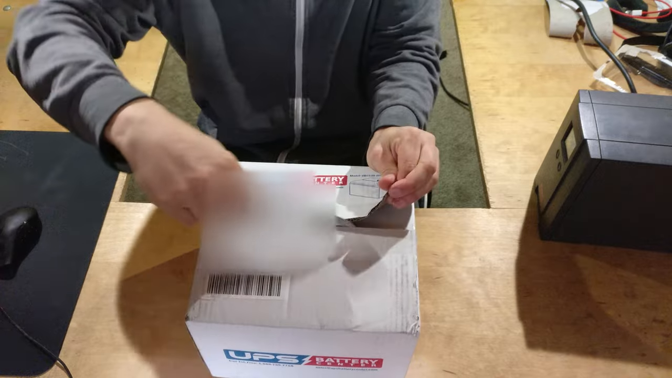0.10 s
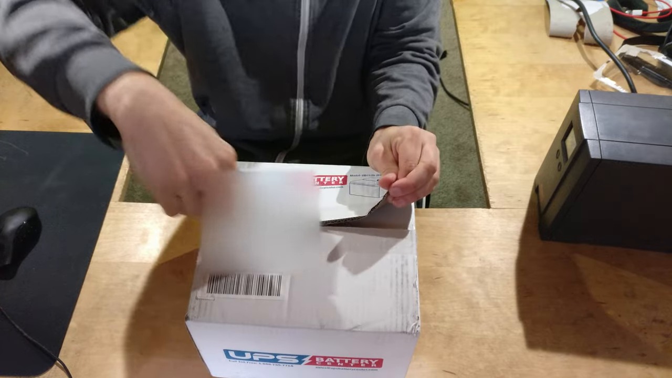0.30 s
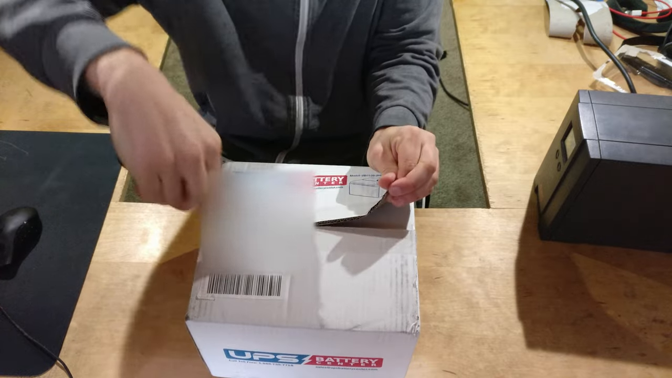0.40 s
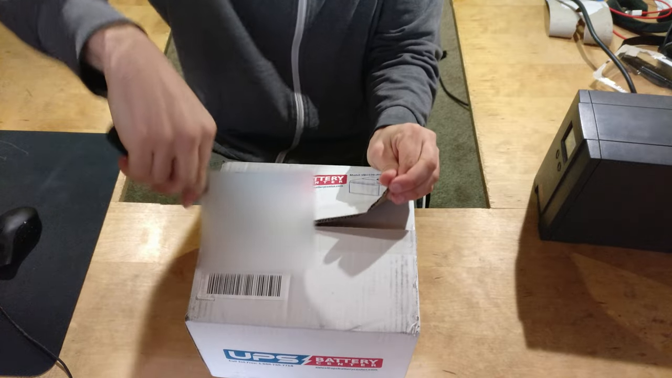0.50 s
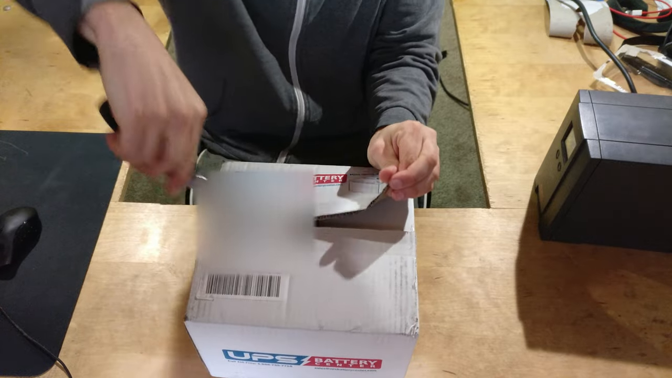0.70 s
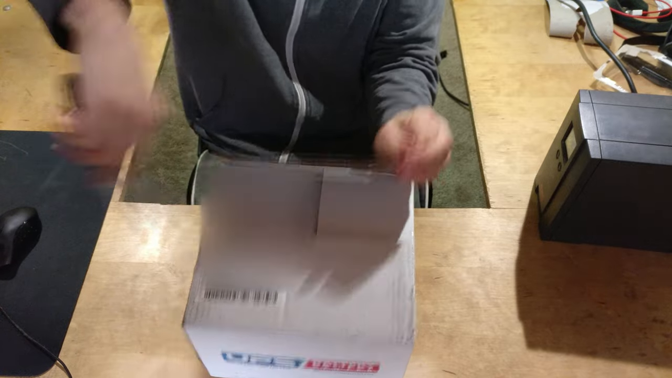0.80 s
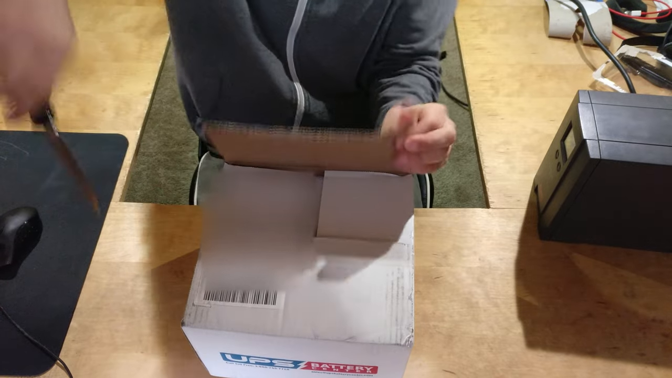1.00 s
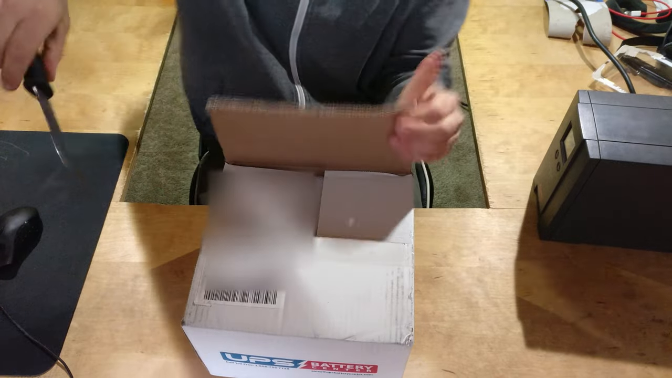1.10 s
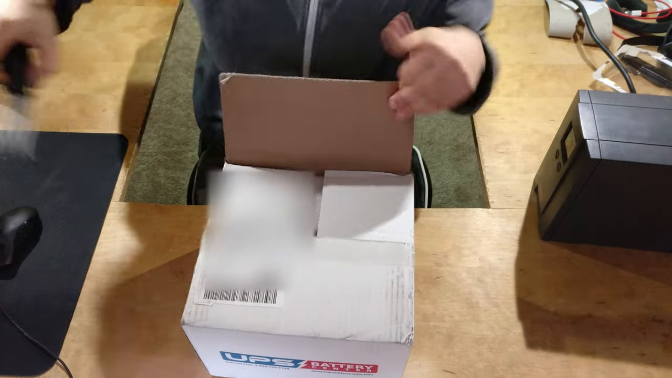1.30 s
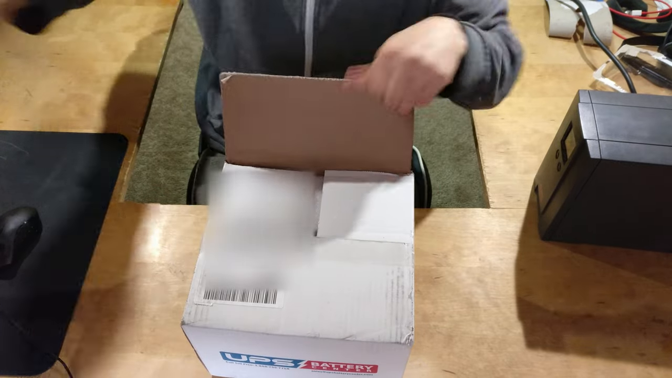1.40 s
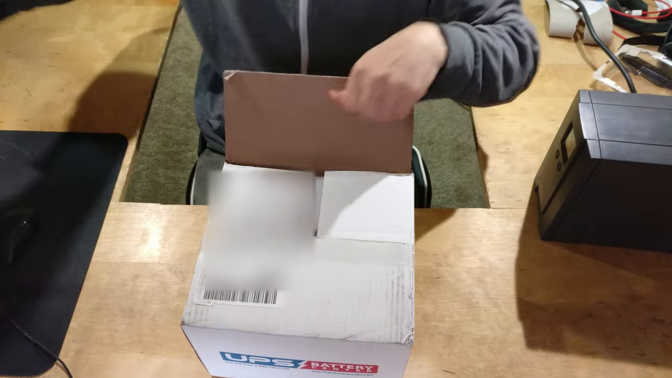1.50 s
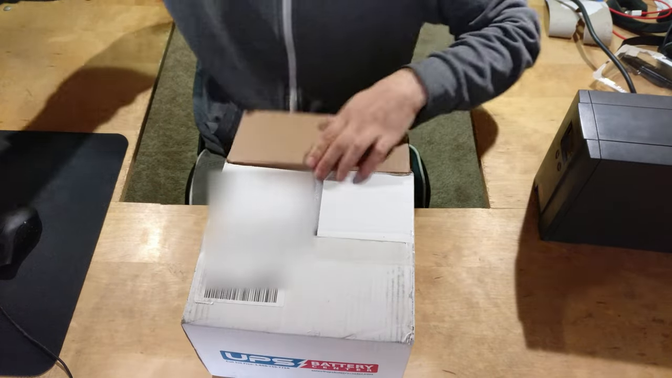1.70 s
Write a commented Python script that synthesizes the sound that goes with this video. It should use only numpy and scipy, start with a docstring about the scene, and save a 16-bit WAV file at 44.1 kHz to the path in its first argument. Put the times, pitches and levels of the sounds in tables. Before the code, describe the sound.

Cardboard box being torn open: hollow thumps, tape snapping loose, then soft brushing of flaps

```python
"""Hands work a cardboard box on a desk below a stereo microphone in a small quiet room, for 1.8 seconds.
After a faint knock, hard knocks ring the hollow box near 0.2 s while tape and flaps scrape in short pulls.
Tape snaps free, hardest near 0.8 s, and shaking swells just after; from 1.16 s hands softly brush the flaps.
A few last knocks and scrapes follow 1.5 s. Decaying modes make the box, random clicks the tape and board,
and noise the snaps; a faint noise hiss lies under all, and the right port hears more of the top treble."""
import sys
import numpy as np
from scipy import signal
from scipy.fft import rfft, irfft, next_fast_len
from scipy.io import wavfile
from scipy.ndimage import uniform_filter1d

SR = 44100
rng = np.random.default_rng(int(sys.argv[2]) if len(sys.argv) > 2 else 0)


def level_to_linear(level):
    """Convert decibel levels to linear amplitude factors, elementwise."""
    exponent = np.asarray(level, float) / 20
    return 10 ** exponent


def wav_out(sig):
    """Save sig, one row per channel (or a flat mono array), as 16-bit PCM at SR to the path in sys.argv[1]."""
    wavfile.write(sys.argv[1], SR, np.round(np.clip(np.atleast_2d(sig).T, -1, 1) * 32767).astype(np.int16))


N = 79380  # length in samples
BRUSH_FROM_S = 1.16  # from here hands brush the flaps
SLIPS_PER_S, SLIP_SCATTER_DB = 3000, 2  # board slips, heard directly and through the box


# How the flap's changing tension shifts the pitch of the panels.
# Each row: time in seconds, pitch ratio of the panel modes.
FLAP_TENSION = [(.79, 1.05), (0.863, 1.02), (0.886, 1.1), (.93, 1.1)]
PANEL_FROM_HZ = 400  # modes above this belong to the panels


def ring(force, hz, t60_s):
    """One mode: pushed by a force, it swings at its pitch and dies away; panel modes follow the tension."""
    ratio = np.ones(N)
    if hz > PANEL_FROM_HZ:
        ratio = np.interp(np.arange(N) / SR, *np.array(FLAP_TENSION).T)
    turn = np.exp(2j * np.pi * np.cumsum(hz * ratio) / SR)
    decay = np.exp(-np.log(1000) / (t60_s * SR))
    # Take out the rotation, let the force decay, then put the rotation back.
    swing = signal.lfilter([1], [1, -decay], force / turn)
    return (turn * swing).imag


def closeness(hz, spot_hz, octaves):
    """A struck or rubbed spot drives the modes near its favoured pitch most."""
    return np.exp(-.5 * (np.log2(hz / spot_hz) / octaves) ** 2)


# The ways the hollow box vibrates.
# Each row: pitch in Hz, gain in dB, time to fade by 60 dB in seconds.
BOX_MODES = [(50.5, 10, .2), (80.4, -7, .15), (108.35, -1, 0.15), (186, -6, 0.14), (230, 1.5, 0.053),
             (308, -8, 0.065), (435, -14, .08), (572, -12.5, .1), (626, 0, .07), (823, -14.5, .06),
             (1073, -12.5, 0.061), (1510, -18, .045), (1850, -8, 0.055), (2680, -12, .035)]
# Knocks on the box.
# Each row: start in seconds, push strength in dB, pitch in Hz that the spot favours, breadth in octaves.
KNOCKS = [(0.054, -48.5, 181, 0.95), (0.2124, -14, 227, 0.9), (0.257, -20.5, 300, 0.97),
          (.258, -38, 2070, .5), (0.271, -6.5, 138.8, 0.38), (.465, -24, 300, 0.76),
          (.4925, -15.5, 217, 0.67), (0.521, -14, 284, 0.29), (.547, -19.5, 250, 0.95),
          (.591, -10.5, 1520, 0.073), (.602, -20.5, 168, 0.82), (.794, -18, 337, 1.5),
          (.815, -14, 300, 0.42), (.865, -13, 395, 3.5), (0.869, -14, 1410, 0.95), (0.884, -13, 54.8, 1.3),
          (1.099, -38.5, 101, 2), (1.18, -51, 90, .5), (1.27, -49, 89, .4), (1.535, -23, 100, 0.53),
          (1.563, -12.5, 335, 0.2), (1.595, -35.5, 74, 3.2), (1.737, -27, 113, 0.87),
          (1.748, -28.5, 144, 1.22)]
# The box shaking under the hands.
# Each row: time in seconds, level of the ringing in dB.
SHAKE_LEVEL = [(0.2, -76.5), (0.292, -41), (0.345, -38.5), (0.41, -33), (0.487, -20), (0.632, -26.5),
               (0.666, -31), (0.792, -30), (0.916, -12.5), (1.004, -36.5), (1.042, -50.5), (1.434, -82.5),
               (1.554, -48), (1.692, -67), (1.746, -35), (1.8, -37.5)]
SHAKE_HZ, SHAKE_OCTAVES = 108, .5
JOLTS_PER_S, JOLT_SCATTER_DB = 330, -1
RASP_INTO_BOX_DB, RASP_SPOT_HZ, RASP_OCTAVES = -27.5, 300, 1.2
PUSH_CYCLES = 0.35  # contact time, in cycles of the mode or favoured pitch, whichever is higher


def box():
    """Knocks, jolts and slipping board push the modes of the hollow box, which ring and add up."""
    jolts = clicks(JOLTS_PER_S, JOLT_SCATTER_DB)
    rung_jolts = 0
    for hz, gain_db, t60_s in BOX_MODES:
        share = closeness(hz, SHAKE_HZ, SHAKE_OCTAVES)
        rung_jolts = rung_jolts + level_to_linear(gain_db) * share * ring(jolts, hz, t60_s)
    shake_db = np.interp(np.arange(N) / SR, *np.array(SHAKE_LEVEL).T, left=-90)
    shake = jolts * level_to_linear(shake_db) / np.std(rung_jolts)
    slips = unit(clicks(SLIPS_PER_S, SLIP_SCATTER_DB)) * pull_gain(True) * level_to_linear(RASP_INTO_BOX_DB)

    out = 0
    for hz, gain_db, t60_s in BOX_MODES:
        force = shake * closeness(hz, SHAKE_HZ, SHAKE_OCTAVES)
        force = force + slips * closeness(hz, RASP_SPOT_HZ, RASP_OCTAVES)
        for start_s, strength_db, spot_hz, octaves in KNOCKS:
            push = np.hanning(int(PUSH_CYCLES * SR / max(hz, spot_hz)) + 3)
            push = push / push.sum() * level_to_linear(strength_db) * closeness(hz, spot_hz, octaves)
            first = int(start_s * SR)
            force[first:first + len(push)] -= push
        out = out + level_to_linear(gain_db) * ring(force, hz, t60_s)
    return out


# Tape fibres snapping.
# Each row: start in seconds, level in dB at the start of the burst.
SNAPS = [(0.261, -49), (0.3946, -48), (0.464, -39.5), (0.5204, -40), (0.5493, -23.5), (0.6572, -45.5),
         (0.7719, -30), (0.7929, -17), (0.8662, -14.5), (1.0962, -48.5), (1.5636, -37.5), (1.731, -49.5)]
# Tone of the crackle and snaps.
# Each row: frequency in Hz, relative level in dB.
CRACKLE_TONE = [(880, -37), (1500, -3), (1890, -8), (2760, -7), (5190, -11.5), (8560, -15.5),
                (14700, -19.5), (16400, -35)]
# How much brighter a brush is than the tape.
# Each row: frequency in Hz, lift in dB.
BRUSH_LIFT = [(6000, 0), (13000, 4.5)]
CRACKLES_PER_S, CRACKLE_SCATTER_DB = 9000, 1.5
CRACKLE_SPREAD = 1  # share of the power heard by one port only
SNAP_MS = 2  # time for a snap to fade to about a third


def tape():
    """Dense clicks crackle along with each pull, and short noise bursts sound where fibres snap."""
    t = np.arange(N) / SR
    bursts = 0
    for start_s, level_db in SNAPS:
        fade = np.exp(-np.maximum(t - start_s, 0) * 1000 / SNAP_MS)
        bursts = bursts + level_to_linear(level_db) * (t >= start_s) * fade
    crackle = spread(lambda: clicks(CRACKLES_PER_S, CRACKLE_SCATTER_DB), CRACKLE_SPREAD)
    crackle = unit(colour(crackle, CRACKLE_TONE))
    crackle = np.where(t < BRUSH_FROM_S, crackle, colour(crackle, BRUSH_LIFT))
    snap = spread(lambda: rng.standard_normal(N), CRACKLE_SPREAD)
    snap = unit(colour(snap, CRACKLE_TONE))
    return pull_gain(False) * patchy() * crackle + bursts * snap


# Tone of the rasping board.
# Each row: frequency in Hz, relative level in dB.
RASP_TONE = [(170, -30.5), (300, -7), (579, 1), (866, -9), (1040, -10.5), (1110, -14), (1890, -11.5),
             (2600, -18), (3380, -69)]
RASP_SPREAD = 0.16  # share of the power heard by one port only


def rasp():
    """Corrugated board slips and creases: random clicks that follow each pull."""
    slips = spread(lambda: clicks(SLIPS_PER_S, SLIP_SCATTER_DB), RASP_SPREAD)
    return unit(colour(slips, RASP_TONE)) * pull_gain(True) * patchy()


# Pulls, scrapes and brushes of the hands.
# Each row: start in seconds, end in seconds, crackle in dB at the start, crackle in dB at the end,
# rasp in dB above the crackle.
PULLS = [(0.208, 0.221, -53, -63.5, 11), (0.254, 0.312, -51.5, -79, 12), (0.318, 0.408, -74.5, -62, 3.5),
         (0.382, 0.501, -63, -51.5, 7.5), (0.515, 0.612, -44, -38, 1.5), (0.615, 0.66, -87, -81, 13),
         (0.651, 0.698, -52, -47.5, 4), (0.743, 0.783, -55.5, -64, -2), (0.771, 0.787, -36, -46.5, 4.5),
         (0.793, 0.87, -35.5, -33.5, 2.5), (0.863, 0.945, -25.5, -52, 8), (0.974, 1.034, -60.5, -71, 5.5),
         (1.065, 1.096, -69.5, -67, -3), (1.099, 1.123, -53.5, -66.5, 5.5), (1.212, 1.259, -77.5, -72, -11),
         (1.267, 1.363, -82, -67.5, -4), (1.362, 1.511, -78, -72, 3), (1.521, 1.553, -66, -57, 6),
         (1.56, 1.6, -52.5, -65.5, 11), (1.593, 1.64, -54.5, -40.5, -6), (1.652, 1.749, -57, -61, -3.5),
         (1.726, 1.781, -52, -62.5, 0.5)]
PULL_ATTACK_MS, PULL_RELEASE_MS = 3.2, 7.2


def pull_gain(with_rasp):
    """Gain over time: each pull starts sharply, slides in level and lets go."""
    t = np.arange(N) / SR
    out = 0
    for start_s, end_s, start_db, end_db, rasp_db in PULLS:
        rise = np.clip((t - start_s) * 1000 / PULL_ATTACK_MS, 0, 1)
        fall = np.exp(-np.maximum(t - end_s, 0) * 1000 / PULL_RELEASE_MS)
        level_db = np.interp(t, [start_s, end_s], [start_db, end_db]) + with_rasp * rasp_db
        out = out + rise * fall * level_to_linear(level_db)
    return out


PATCHES_PER_S = 200
PATCHY_DB, BRUSH_PATCHY_DB = 3.9, 1.8  # scatter of the gain before it is smoothed


def patchy():
    """Glue lets go unevenly: the gain wavers quickly at random, more gently for brushing hands."""
    patch = int(SR / PATCHES_PER_S)
    depth_db = np.where(np.arange(N) / SR < BRUSH_FROM_S, PATCHY_DB, BRUSH_PATCHY_DB)
    steps = np.repeat(rng.standard_normal(N // patch + 1), patch)
    return level_to_linear(depth_db * uniform_filter1d(steps, patch)[:N])


ROOM_T60_S, ROOM_LOW_DB, ROOM_HIGH_DB = 0.12, -14.5, -4.5
ROOM_SPLIT_HZ = 650  # middle of the slope from low to high level


def room(x):
    """Desk and walls scatter the sound, differently to each port and more so in the treble."""
    t = np.arange(SR // 2) / SR
    fade = np.exp(-np.log(1000) * t / ROOM_T60_S)
    tail = rng.standard_normal((2, len(t))) * fade * (t > .001)
    tail /= np.sqrt(np.sum(tail ** 2, axis=1, keepdims=True))
    wet = signal.fftconvolve(tail, x, axes=1)[:, :N]
    return colour(wet, [(ROOM_SPLIT_HZ / 2, ROOM_LOW_DB), (ROOM_SPLIT_HZ * 2, ROOM_HIGH_DB)])


# Tone of the hiss.
# Each row: frequency in Hz, relative level in dB.
HISS_TONE = [(25, -7), (114, 0.5), (272, -11), (367, -29), (667, -21), (1150, -25), (2260, -29),
             (4710, -32), (14700, -36), (16400, -31.5)]
HISS_DB = -70  # average (rms) level as it reaches the ports


def hiss():
    """Room tone and microphone hiss: steady noise whose bass is mostly shared by both ports."""
    mid, side = rng.standard_normal((2, N))
    side = colour(side, [(150, -10.0), (1500, -2)])
    both = np.array([mid + side, mid - side])
    return level_to_linear(HISS_DB) * unit(colour(both, HISS_TONE))


def clicks(rate, scatter_db):
    """Single-sample clicks at random times, with random sign and strength."""
    hit, size, sign = rng.random(N), rng.exponential(size=N), rng.choice([-1, 1], N)
    return (hit < rate / SR) * sign * level_to_linear(scatter_db * size)


def spread(make, share):
    """A wide source: part reaches both ports alike, part only one."""
    share = np.clip(share, 0, 1)
    common = np.sqrt(1 - share) * make()
    return common + np.sqrt(share) * np.array([make(), make()])


def colour(x, points, share=1):
    """Filter by (Hz, dB) points joined on a log frequency axis; share scales the dB."""
    size = next_fast_len(2 * N)
    hz = np.arange(size // 2 + 1) * SR / size + 1  # 1 Hz up, so the log exists
    point_hz, point_db = np.array(points, float).T
    gain_db = share * np.interp(np.log(hz), np.log(point_hz), point_db)
    return irfft(rfft(x, size) * level_to_linear(gain_db), size)[..., :N]


def unit(x):
    """Scale to an average (rms) level of 1."""
    return x / np.sqrt(np.mean(x ** 2))


BASS_CUT_HZ = 112.3  # a small box radiates little deep bass


def scene():
    """All handling sounds, direct and through the room, with their bass thinned, over the hiss."""
    direct = tape() + rasp() + box()
    handling = direct + room(direct)
    bass_cut = signal.butter(3, BASS_CUT_HZ, "high", fs=SR, output="sos")
    return signal.sosfilt(bass_cut, handling) + hiss()


# How the two microphone ports differ in tone.
# Each row: frequency in Hz, left minus right in dB.
PORT_DIFFERENCE = [(100, -0.5), (400, -1), (1300, 2), (2400, 0.5), (4400, 1), (8000, -11), (10500, -11.5),
                   (14000, -8)]


def ports(x):
    """Each port takes half of the difference in tone, in opposite directions."""
    return np.array([colour(x[0], PORT_DIFFERENCE, .5), colour(x[1], PORT_DIFFERENCE, -.5)])


def band_limit(x):
    """A steep low-pass at the top of the band."""
    return signal.sosfilt(signal.butter(12, 17160, fs=SR, output="sos"), x)


def record(dry):
    """The two ports colour the sound differently, and a steep filter cuts the top."""
    mix = ports(dry)
    top_cut = signal.ellip(8, .2, 70, 16450, fs=SR, output="sos")  # ripple dB, depth dB, edge Hz
    mix = signal.sosfilt(top_cut, mix)
    return band_limit(mix)


dry = scene()
out = record(dry)
wav_out(out)
```